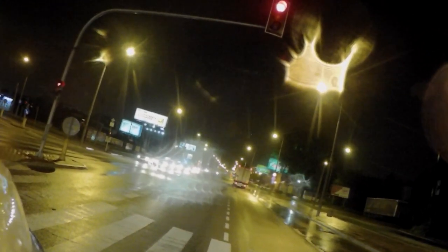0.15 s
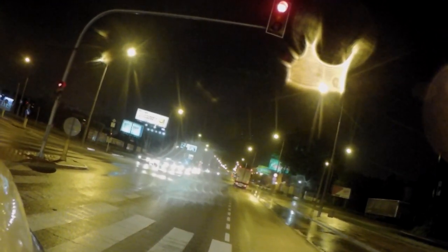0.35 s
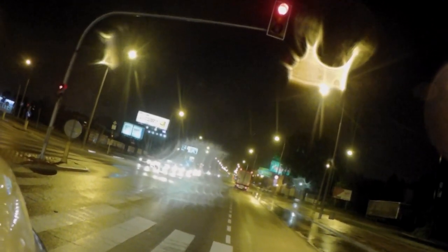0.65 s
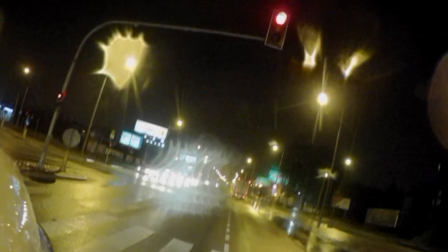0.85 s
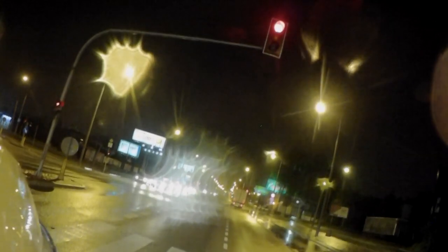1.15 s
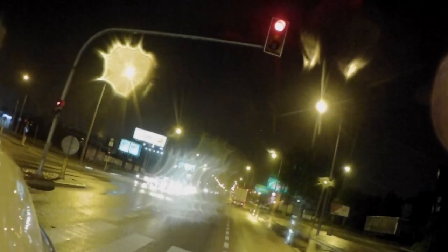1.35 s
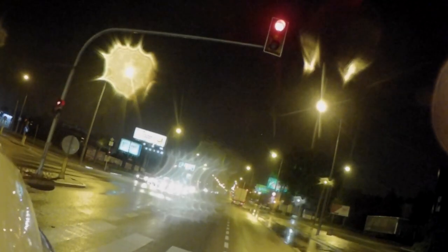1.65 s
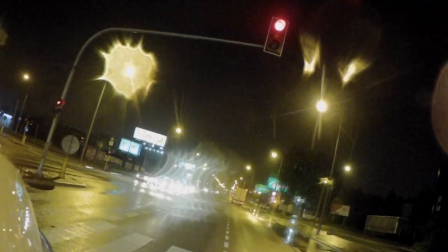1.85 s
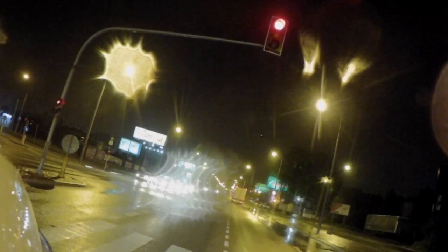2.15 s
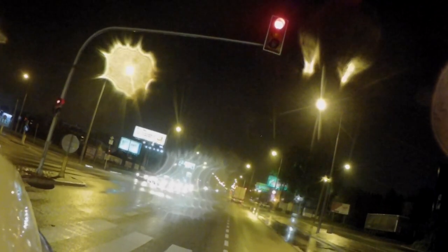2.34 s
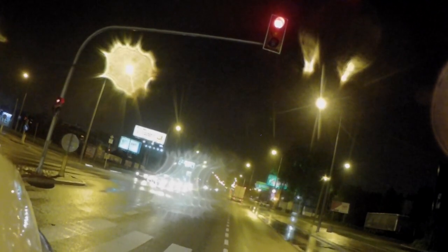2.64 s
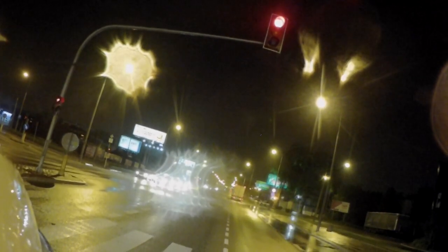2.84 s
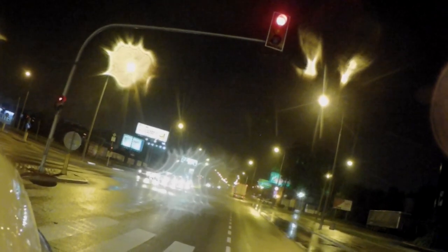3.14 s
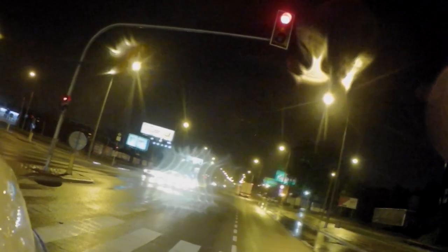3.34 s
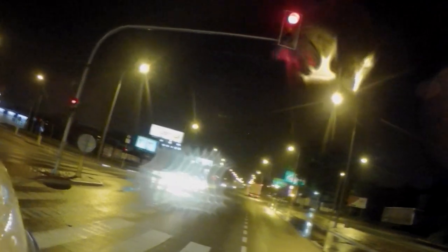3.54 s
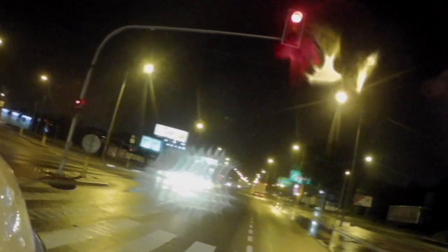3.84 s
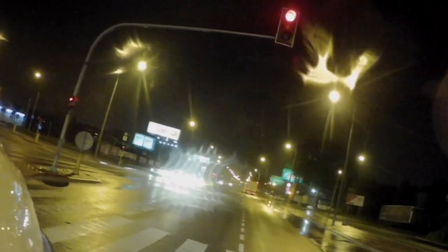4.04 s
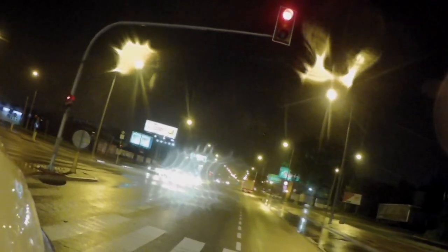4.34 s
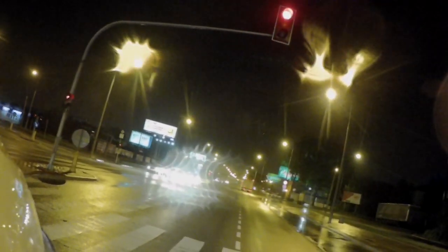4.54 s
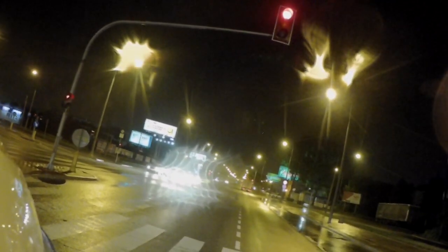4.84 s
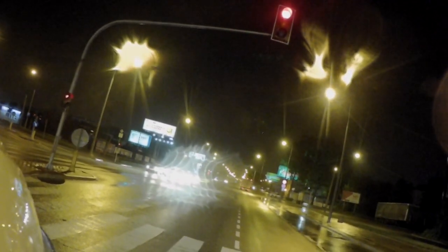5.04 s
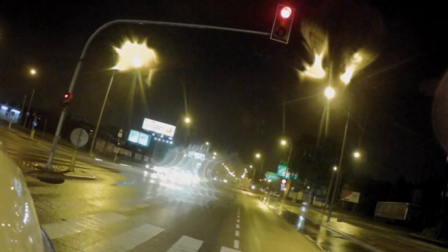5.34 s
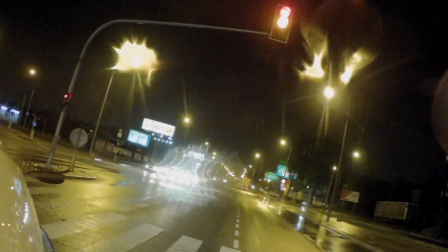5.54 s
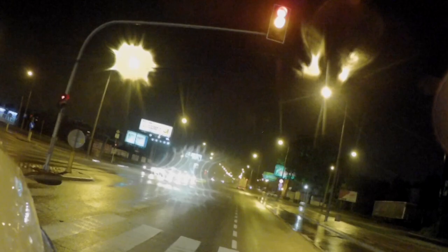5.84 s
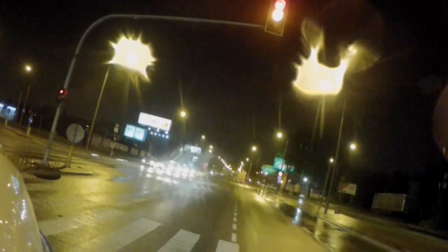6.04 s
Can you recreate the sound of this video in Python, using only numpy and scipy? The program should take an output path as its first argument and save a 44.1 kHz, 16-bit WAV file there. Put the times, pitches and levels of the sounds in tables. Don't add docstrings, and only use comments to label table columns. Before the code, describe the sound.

A four-cylinder motorcycle idles at a wet night crossing, heard close from a cased microphone on the bike. A low, uneven exhaust throb carries metallic clatter, faint valve ticks and soft road hiss. Wind thumps come in clusters, with a few raindrops tapping the case. Late on, stronger buffets flutter the case, and in the final moments the revs climb and the exhaust barks loudly.

```python
import sys
import numpy as np
from scipy import signal
from scipy.io import wavfile
from scipy.ndimage import uniform_filter1d

SR = 44100
rng = np.random.default_rng(int(sys.argv[2]) if len(sys.argv) > 2 else 0)


def amplitude_ratio(level_db):
    exponent = np.asarray(level_db, float) / 20
    return 10 ** exponent


def dump(signal):
    limited = np.clip(np.atleast_2d(signal).T, -1, 1)
    pcm = np.round(limited * 32767).astype(np.int16)
    wavfile.write(sys.argv[1], SR, pcm)


N = 272979
TIME = np.arange(N) / SR

# (time [s], four-stroke cycles per second [Hz])
IDLE_HUNT = [(0.0, 10.91), (0.23, 10.39), (0.67, 10.99), (0.95, 10.63), (1.29, 11.13), (1.66, 10.73),
             (2.21, 11.05), (2.63, 10.61), (3.01, 11.11), (3.33, 10.76), (3.67, 11.33), (3.99, 10.92),
             (4.08, 11.02), (4.6, 10.73), (5.26, 11.09), (5.54, 10.55)]
# (time [s], speed added each second [Hz/s])
GRIP_TURNS = [
    (5.636, 3.41),
    (5.791, 7.384),
    (5.937, 17.643),
]
# (time [s], level [dB])
THROTTLE = [
    (0, -.2),
    (5.4, .3),
    (5.64, 1.5),
    (5.72, -3),
    (5.79, -4),
    (5.87, -1),
    (5.95, -1.5),
    (5.995, 10),
    (6.04, 12),
    (6.085, 8.5),
]
CYLINDER_DB = [0, 0, -3.6, -7]
VALVE_DB = [3.2, 1.5, 2, 3.2]
# (frequency [Hz], width [Hz], level [dB], polarity [+1/-1])
PIPE_MODES = [(98, 5.5, 0, -1), (80, 78, -17, 1), (44, 12, -24, 1), (130, 10, -15.5, -1),
              (266, 12, -15.5, -1), (304, 20, -18, -1), (452, 20, -26, 1), (565, 40, -30, -1)]
# (frequency [Hz], density [dB per Hz])
CLATTER_COLOUR = [(110, -27), (150, -19), (180, -20), (275, -3), (361, -9.5), (598, -0.5), (846, -15),
                  (1180, -17), (1320, -22), (1690, -16), (2490, -21), (3370, -32), (3790, -31), (4700, -56)]
# (frequency [Hz], level [dB], decay t60 [s])
VALVE_RING = [(3730, 8, 0.023), (3900, 0, 0.036), (6600, -19.5, .012), (1800, 9, 0.019), (12600, -13, .014)]
# (time [s], peak [dB], pitch [Hz])
BUFFETS = [(1.412, -9.5, 98.5), (1.458, -12, 55), (1.523, -7.5, 130), (1.693, -8, 110), (1.721, -13, 190),
           (1.803, -11.5, 150), (2.513, -11, 113), (2.621, -7.5, 131), (2.627, -12, 308),
           (2.787, -7.5, 175), (2.816, -13, 118), (3.79, -28, 200), (4.169, -10.5, 200), (4.237, -13, 161),
           (4.269, -13, 203), (4.75, -1, 159), (4.809, -3, 338), (4.8125, -7, 151), (4.824, -12, 110),
           (4.991, -6, 109), (5.013, -19, 131), (5.16, -10.5, 100), (5.169, -5, 100), (5.536, -1, 193),
           (5.606, -10, 150), (5.843, -11, 111), (5.888, -6.5, 60), (6.037, -9, 45), (6.053, -4, 255),
           (6.07, 1.5, 230)]
# (time [s], peak [dB], pitch
# [Hz], half length [s])
FLUTTERS = [(4.735, -13, 533, 0.017), (4.76, -9, 425, 0.011), (4.817, -11.5, 580, .014),
            (4.995, -14.5, 590, .025), (5.168, -11.5, 590, .018), (5.548, -2, 276, 0.009),
            (5.549, -7.5, 560, 0.0085), (5.606, -15, 560, .012), (5.926, -12, 436, .05),
            (6.021, -3.5, 554, 0.0093), (6.05, -7.5, 483, 0.016), (6.073, -7, 564, 0.0096),
            (6.138, -12.5, 560, 0.0097)]
# (time [s], peak [dB], ring [Hz], width [Hz])
DROPS = [(2.574, -12, 1500, 800), (2.574, -22, 2800, 1100), (2.574, -44, 7200, 2500),
         (3.4755, -33, 5500, 1800), (3.56, -32, 3800, 700), (3.731, -34, 3800, 500),
         (3.787, -17.5, 884, 170), (3.826, -38, 3800, 500), (4.7972, -28.5, 9000, 1800),
         (4.797, -33, 5500, 1400), (5.008, -40, 9000, 1500), (5.079, -30, 3940, 500),
         (5.757, -30, 3680, 550), (6.069, -36, 5200, 1500)]
# (frequency [Hz], density [dB per Hz])
HISS_COLOUR = [(2530, 0), (4300, 1), (4690, -7.5), (5220, -3.5), (5600, -7), (6620, 1.5), (7530, -5),
               (9800, -9.5), (12700, -5), (15600, -14.5)]
# (time [s], level [dB])
BREEZE = [(0, -32.5), (.41, -32), (1.14, -35.5), (1.52, -30), (2.6, -29.5), (3.19, -30.5), (3.38, -36),
          (4.25, -30.5), (4.48, -36), (4.93, -30), (5.4, -33.5), (5.85, -23.5), (6.19, -23.5)]
# (frequency [Hz], density [dB per Hz])
BREEZE_COLOUR = [(12, -15), (30, -21), (70, 5), (200, -5), (500, -8.5), (800, -21.5), (2000, -50)]
# (frequency [Hz], density [dB per Hz])
RUMBLE_COLOUR = [(8, -25), (22, 0), (40, -1), (70, -4), (120, -9), (200, -30)]

FIRST_FIRING, FIRST_VALVE = .8815, .13
EVEN_FROM_S, EVEN_OUT_S = 5.75, .12
EXHAUST_DB, ENGINE_DB, RUMBLE_DB = -34.2, -36, -32
CLATTER_DB, HISS_DB, TICK_DB = 10.5, -14.5, -19.5
LOAD_SHARE = 0.09
SPRAY_DB, SPRAY_GONE_S, SPRAY_FADE_S = 2.1, 3.3, 0.88
PUSH_CYCLES, SHORTER_PER_DB = 1.15, .05
PUSH_HISS, FLUTTER_HISS = .27, .4


def evened(x):
    return x / np.sqrt(np.mean(x ** 2) + 1e-20)


def curve(rows):
    times, values = np.transpose(rows)
    return np.interp(TIME, times, values)


def add(mix, s, sound):
    part = mix[max(round(s * SR), 0):][:len(sound)]
    part += sound[:len(part)]


def noise(colour, patchy_db, size=1024):
    hz = np.fft.rfftfreq(size, 1 / SR)
    a, b, patches = rng.standard_normal((N // (size // 4) + 5, len(hz), 3)).T
    patches = uniform_filter1d(patches, size=12, axis=0)
    patches = evened(uniform_filter1d(patches, size=10, axis=1))
    f, level_db = np.transpose(colour)
    colour_db = np.interp(np.log(hz + 1), np.log(f + 1), level_db, left=-90, right=-90)
    spectra = (a + 1j * b) * amplitude_ratio(colour_db[:, None] + patchy_db * patches)
    return evened(signal.istft(spectra, nperseg=size, noverlap=size * 3 // 4)[1][:N])


def drift(hz):
    lowpass = signal.butter(2, hz, fs=SR, output="sos")
    return evened(signal.sosfiltfilt(lowpass, rng.standard_normal(N)))


def crank():
    times, speeds = np.transpose(IDLE_HUNT)
    points = np.arange(len(times))
    step = np.interp(TIME, times, points)
    eased = step - np.sin(2 * np.pi * step) / (2 * np.pi)
    idle = np.interp(eased, points, speeds)
    pull = sum(gain * np.maximum(TIME - s, 0) for s, gain in GRIP_TURNS)
    return np.cumsum(idle + pull) / SR


def strokes(first, pattern_db, spread_db):
    quarter = np.floor(4 * (crank() - first)).astype(int)
    at = np.flatnonzero(np.diff(quarter)) + 1
    pattern = np.array(pattern_db) - np.mean(pattern_db)
    lope = np.exp(-np.maximum(TIME[at] - EVEN_FROM_S, 0) / EVEN_OUT_S)
    chance_db = spread_db * np.clip(rng.standard_normal(len(at)), -2, 2)
    out = np.zeros(N)
    out[at] = amplitude_ratio(pattern[quarter[at] % 4] * lope + chance_db)
    return out


def exhaust():
    t = TIME[:SR // 2]
    ring = sum(sign * amplitude_ratio(db) * width * np.exp(-np.pi * width * t) * np.cos(2 * np.pi * hz * t)
               for hz, width, db, sign in PIPE_MODES)
    lag = np.exp(-1 / (.0006 * SR))
    firings = signal.lfilter([1 - lag], [1, -lag], strokes(FIRST_FIRING, CYLINDER_DB, spread_db=.9))
    return amplitude_ratio(EXHAUST_DB) * signal.oaconvolve(amplitude_ratio(curve(THROTTLE)) * firings, ring)[:N]


def body_clatter(throb_db):
    shocks = strokes(FIRST_FIRING + .05, CYLINDER_DB, spread_db=3.0)
    puff = signal.oaconvolve(shocks, np.exp(-TIME[:4000] / 0.015))[:N]
    return evened(noise(CLATTER_COLOUR, patchy_db=0.58) * (1 + 0.24 * puff) * amplitude_ratio(0.3 * throb_db))


def valve_ticks():
    t = TIME[:2000]
    ring = sum(amplitude_ratio(db - 60 * t / t60) * np.sin(2 * np.pi * hz * t) for hz, db, t60 in VALVE_RING)
    return evened(signal.oaconvolve(strokes(FIRST_VALVE, VALVE_DB, spread_db=8.0), ring)[:N])


def road_hiss(throb_db):
    flicker_db = .5 * drift(40)
    spray_db = SPRAY_DB * np.clip((SPRAY_GONE_S - TIME) / SPRAY_FADE_S, 0, 1)
    return amplitude_ratio(spray_db + throb_db + flicker_db) * noise(HISS_COLOUR, patchy_db=.9, size=512)


def engine_noise():
    cycles = crank()
    throb_db = .2 * np.cos(2 * np.pi * (cycles - .52)) + .75 * np.cos(4 * np.pi * (cycles - .45))
    throb_db += .4 * drift(45)
    mix = amplitude_ratio(CLATTER_DB) * body_clatter(throb_db)
    mix += amplitude_ratio(TICK_DB) * valve_ticks()
    mix += amplitude_ratio(HISS_DB) * road_hiss(throb_db)
    return amplitude_ratio(ENGINE_DB + LOAD_SHARE * curve(THROTTLE)) * mix


def buffets():
    out = np.zeros(N)
    puffs = noise([(60, -10), (250, 0), (680, 0), (850, -20), (1200, -45)], patchy_db=0)
    gusts = [(s, db, hz, (PUSH_CYCLES - SHORTER_PER_DB * db) / hz, PUSH_HISS) for s, db, hz in BUFFETS]
    gusts += [(*flutter, FLUTTER_HISS) for flutter in FLUTTERS]
    for s, db, hz, length, share in gusts:
        t = np.arange(-length, length, 1 / SR)
        puff = evened(puffs[round(s * SR) - len(t) // 2:][:len(t)])
        push = -(1 - share) * np.cos(2 * np.pi * hz * t) + share * puff / 2
        swell = np.exp(-(2.2 * t / length) ** 2)
        add(out, s - length, amplitude_ratio(db) * push * swell)
    return out


def rain():
    out, t = np.zeros(N), TIME[:2000]
    for s, db, hz, width in DROPS:
        u = np.pi * width * t
        add(out, s, amplitude_ratio(db) * np.e * u * np.exp(-u) * np.sin(2 * np.pi * hz * t))
    return out


def breeze():
    level_db = curve(BREEZE) + 5.0 + 1.1 * drift(35)
    air = amplitude_ratio(level_db) * noise(BREEZE_COLOUR, patchy_db=1.0, size=2048)
    return air + amplitude_ratio(RUMBLE_DB) * noise(RUMBLE_COLOUR, patchy_db=3.0, size=4096)


def scene():
    return (exhaust() + engine_noise() + buffets() + rain() + breeze())[None]


def low_pass(x):
    return signal.sosfilt(signal.butter(12, 15730, fs=SR, output="sos"), x)


def record(dry):
    ceiling = .71
    cut = signal.sosfilt(signal.butter(2, 16, "highpass", fs=SR, output="sos"), dry)
    cut = cut * np.minimum(np.minimum(TIME, TIME[::-1]) / .004, 1)
    finished = cut / (1 + abs(cut / ceiling) ** 6) ** (1 / 6)
    return low_pass(finished)


dry = scene()
out = record(dry)
dump(out)
```